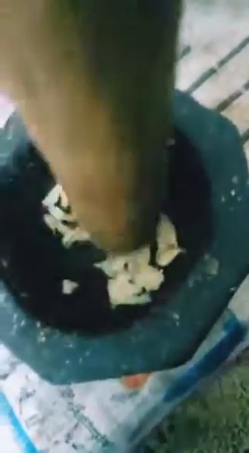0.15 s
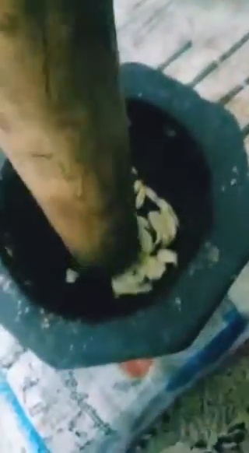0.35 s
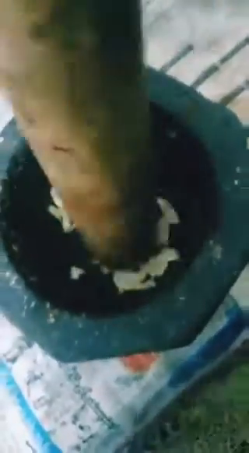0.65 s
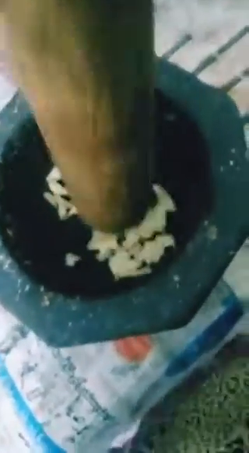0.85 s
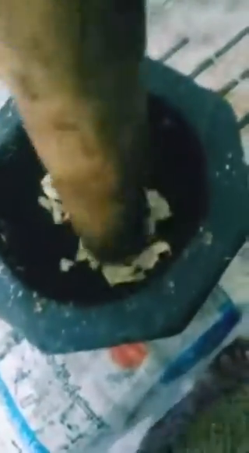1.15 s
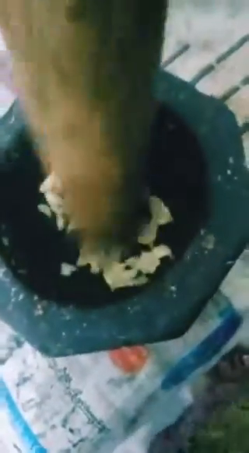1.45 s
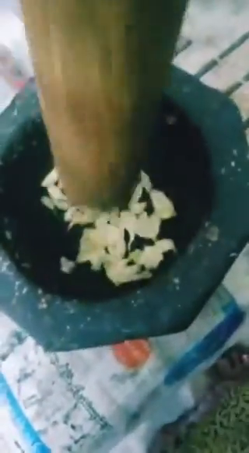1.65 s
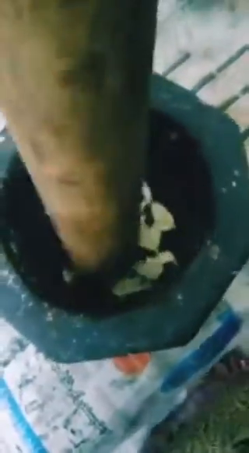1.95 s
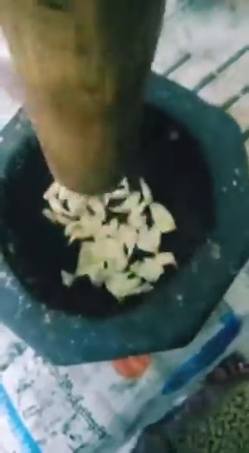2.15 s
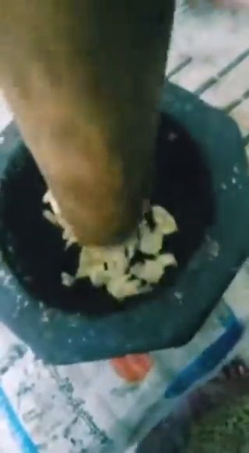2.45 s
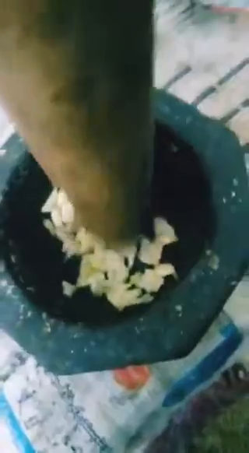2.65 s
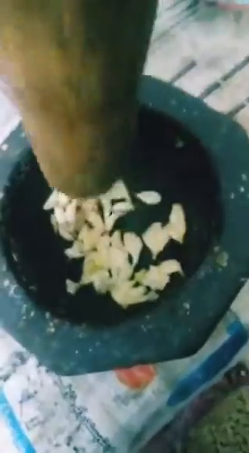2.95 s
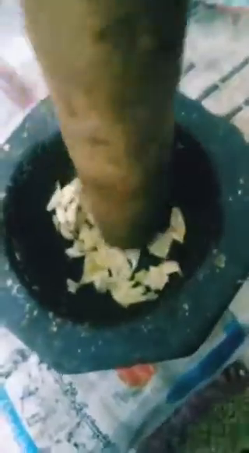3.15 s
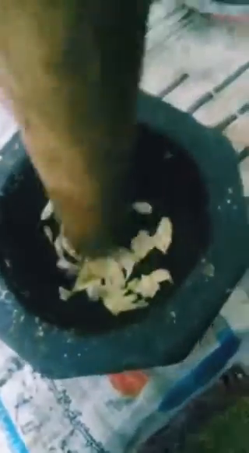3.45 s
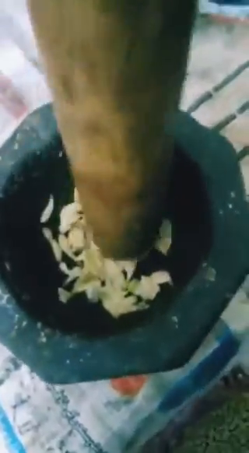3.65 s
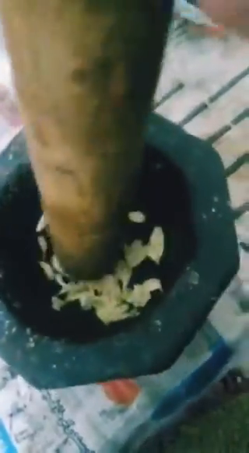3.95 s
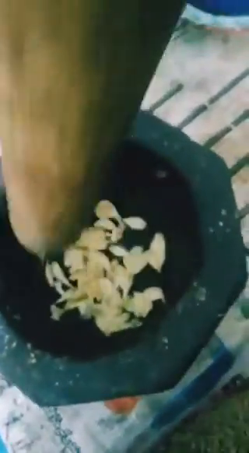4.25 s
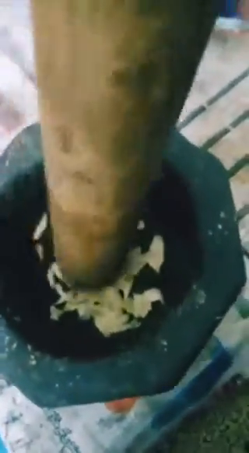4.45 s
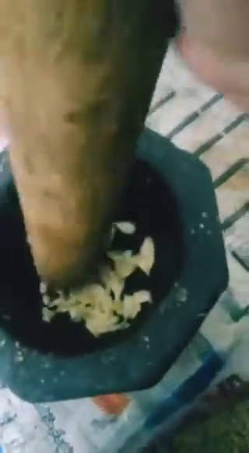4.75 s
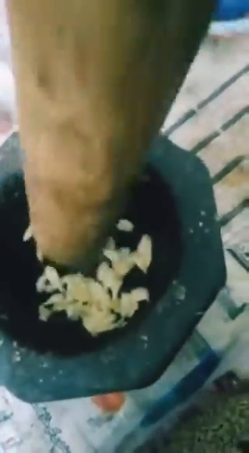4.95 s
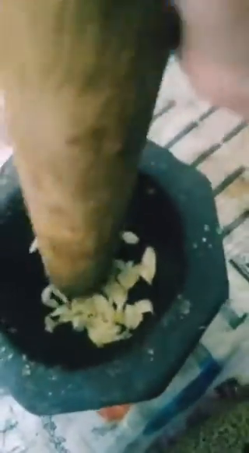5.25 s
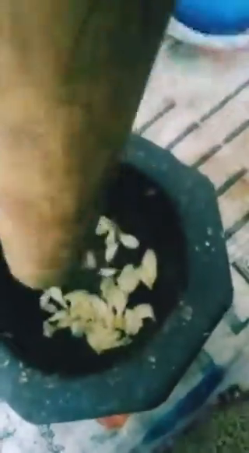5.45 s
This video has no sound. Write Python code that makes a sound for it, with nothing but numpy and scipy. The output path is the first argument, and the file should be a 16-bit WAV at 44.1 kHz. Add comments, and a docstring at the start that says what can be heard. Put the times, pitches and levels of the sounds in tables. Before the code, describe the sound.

A wooden pestle pounds garlic in a stone mortar with steady, crunchy thuds that boom in a hard-walled kitchen, over a soft hiss.

```python
"""Pounding garlic in a hard kitchen.

A stone mortar stands on the floor, heard on a stereo microphone both directly and off the walls.
Each blow of the wooden pestle crunches the cloves, thuds into the floor and sets the room booming;
now and then wood knocks on bare stone, once loudly. Behind it lie a steady hiss and a thin, fitful
whistle, which the recorder's gain control ducks at each hard blow."""
import sys
import numpy as np
from scipy import signal
from scipy.fft import rfft, irfft
from scipy.io import wavfile
from scipy.ndimage import uniform_filter1d, minimum_filter1d

SR = 44100
rng = np.random.default_rng(int(sys.argv[2]) if len(sys.argv) > 2 else 0)


def wav_out(sig):
    """Save sig, one row per channel (or a flat mono array), as 16-bit PCM at SR to the path in sys.argv[1]."""
    wavfile.write(sys.argv[1], SR, np.round(np.clip(np.atleast_2d(sig).T, -1, 1) * 32767).astype(np.int16))


N = 246519

# Levels in the tables are relative.
# pestle blows: t/s, thud/dB, crunch/dB, clack/dB
BLOWS = [(-0.048, -6.5, -12, -3), (0.3595, -15, -14, -5), (0.7723, -11, -18.5, -5),
         (1.1870, -13, -14, -3.5), (1.5830, -13, -12, -4.5), (1.9900, -9.5, -22, 1),
         (2.4003, -3, -9.5, 1.5), (2.8194, 0, -3, 2), (3.2270, -38, -13, -17.5), (3.6388, -11, -11.5, -1),
         (4.0511, -6, -9, -2.5), (4.4677, -3, -9.5, -1), (4.8853, -1.5, -7.5, 1),
         (5.2895, -11.5, -12, -4.5)]
# spectra of the bursting cloves and of the mortar's tap on the floor: f/Hz, level/dB
CRUNCH_COLOUR = [(100, -38.5), (400, 9), (900, 2.5), (2500, 1), (5000, 0.5), (8000, -4.5), (12000, -7),
                 (16000, 2)]
CLACK_COLOUR = [(60, -20.5), (170, -3.5), (300, -9), (450, 3), (560, 12.5), (760, 10), (1000, 6.5),
                (1300, -1), (2030, 4), (2250, -1.5), (2500, 2), (3200, -3), (8000, -1.5)]
# short ring of the mortar on the floor: f/Hz, level/dB, t60/s
MORTAR_MODES = [(435.3, -41.5, 0.075), (770, -50, 0.046)]
# wood meets bare stone: t/s, level/dB, overtone lift/dB
KNOCKS = [(1.9897, 10, -14), (3.6462, -16.5, 6.5), (4.0595, -14, 4), (4.475, -9, -1), (4.8935, -9.5, 0),
          (5.2990, -11.5, 0)]
# ring of the pestle on stone, two low modes first, then the overtones that a knock can brighten:
# f/Hz, level/dB, t60/s
PESTLE_MODES = [(920, 11, 0.024), (1000, -22, 0.042), (1600, 13.5, 0.01), (2010, 5, 0.026),
                (2500, -0.5, 0.028)]
# the pestle grazes the cloves as it lifts: t/s, length/s, level/dB
SCRAPES = [(0.518, 0.066, -32), (1.017, 0.1, -33.5), (1.436, 0.074, -33.5), (3.23, 0.05, -32.5),
           (4.25, 0.11, -38)]
# spectrum of a graze: f/Hz, level/dB
SCRAPE_COLOUR = [(500, -22), (2000, -6), (2700, 5), (3400, 2), (5000, -19.5), (12000, -12)]
# single reflections off floor and walls: delay/s, gain
ECHOES = [(.0068, 0.18), (.0205, .15), (.0325, 0.2), (0.0742, 0.15), (0.0956, 0.13)]
# standing waves of the kitchen: f/Hz, level/dB, t60/s
ROOM_MODES = [(102.7, -15, 1), (146.4, -6, 0.98), (185.4, 2.5, 0.58), (204, 4, 0.54), (232, -2.5, 0.63),
              (241.2, 5, 0.66), (272, -2, 0.66), (280.6, -23, 0.2), (340, -5, 1), (360.4, 5.5, 0.8),
              (409.5, 12, 0.9), (412.8, 12.5, 0.68), (449, 6, 0.46), (454, 7, 0.5), (556, 3.5, 0.52),
              (683, -2, 0.12), (766, 9, 0.33), (924, -2, 0.73), (1030, -8, 0.76)]
# spectrum of the diffuse tail: f/Hz, level/dB
TAIL_COLOUR = [(50, -45), (120, 21), (220, -3.5), (440, 9), (520, -8), (900, 0), (1300, 4.5), (2500, 1.5),
               (5000, 3), (15000, -4)]
# decay of the diffuse tail: f/Hz, t60/s
TAIL_T60 = [(100, 0.59), (300, 0.57), (800, 0.58), (2000, 0.55), (6000, 0.87), (15000, 0.59)]
# hiss spectrum at each microphone port: f/Hz, level/dB
HISS_LEFT = [(30, -38), (90, -14), (220, 3), (500, 1.5), (1000, 6.5), (2000, 7.5), (2800, 0), (4000, 9),
             (4700, 5), (6200, -7), (9000, -5.5), (11800, -11), (15000, -8)]
HISS_RIGHT = [(30, -38), (90, -11), (220, 4), (500, 2), (1000, 3.5), (2100, 1.5), (2900, 6), (4000, 11),
              (4900, 6), (6200, 3.5), (9000, 2), (11800, 1.5), (15000, 0)]
# spells of whistling, most with a surge of hiss: t/s, length/s, hiss change/dB, whistle/dB
SURGES = [(0.499, 0.12, 2, -38), (0.795, 0.12, 0, -34), (1.212, 0.098, 0.5, -38), (1.453, .38, 3.5, -37.5),
          (2.068, .38, 5, -29.5), (2.97, 0.52, 4, -39), (3.429, 0.15, 3.5, -32.5), (3.545, .23, 2, -40.5),
          (3.892, 0.072, -1.5, -31), (4.637, 0.13, 2.5, -37)]
# narrow fizz at the top of hearing: f/Hz, width/Hz, level/dB
FIZZ_BAND = (15150, 900, -34)
# likeness of the two microphone ports: f/Hz, correlation (0-1)
PORT_CORRELATION = [(100, 1), (300, 0.94), (600, 0.73), (1100, 0), (4000, 0.12), (9000, 0), (14500, 0.42)]


def pounding(thud_db=1, crunch_db=-1, clack_db=17, rebound_s=0.007, cushion=0.54, spot_count=4):
    """Crunch, thud, rebound and knocks reach the microphone directly and by way of the walls."""
    early = SR // 4  # the pounding is already under way
    direct = np.zeros((2, N + early))
    spots = np.zeros((spot_count, 2, N + early))  # each spot of the bowl wakes the room differently
    for k, (s, force_db, snap_db, stone_db) in enumerate(BLOWS):
        s += early / SR
        to_room = spots[k % spot_count]
        push = gain_of(thud_db + force_db) * thud()
        stone = gain_of(clack_db + stone_db) * clack()
        lead_s, crackle = crunch()
        snaps = gain_of(crunch_db + snap_db) * crackle
        add(direct, s - lead_s, snaps)
        add(to_room, s - lead_s, gain_of(-11) * snaps)
        add(direct, s, push)
        add(to_room, s, gain_of(-8 - cushion * force_db) * push)  # soft blows lose more punch than boom
        add(direct, s + rebound_s, gain_of(-9) * stone)
        add(to_room, s + rebound_s, stone)
    for s, db, bright_db in KNOCKS:
        s += early / SR
        ring = gain_of(db) * knock(bright_db)
        add(direct[0], s + 0.00035, ring)  # later but louder at the left port
        add(direct[1], s, gain_of(-5.5) * ring)
        add(spots[0], s, gain_of(-15) * ring)
    reverb = sum(room(spot)[:, :N + early] for spot in spots)
    return (direct + reverb)[:, early:]


def thud(hz=290, swell_s=0.0022, crest_s=0.002763):
    """The cushioned push of mortar on floor: a swing or two that swell and die at once."""
    t = np.arange(SR // 25) / SR
    push = (t / swell_s * np.exp(1 - t / swell_s)) ** 3
    return push * np.cos(2 * np.pi * hz * (t - crest_s))


def crunch(lead_s=0.016, press_db=-11, press_s=0.009):
    """Skins crackle under rising pressure, then the clove bursts; returns lead time and sound."""
    t = np.arange(SR // 25) / SR - lead_s + 0.0034  # zero at the burst, just before the thud
    burst = np.exp(-abs(t) / 0.0012)
    pressure = gain_of(press_db) * np.exp(np.minimum(t / press_s, -t / 0.002))
    noise = rng.standard_normal((2, len(t)))
    grain_db = 3.5 * rng.standard_normal(len(t))[np.arange(len(t)) // 10]
    snaps = evened(noise * gain_of(grain_db)) * (burst + pressure)
    return lead_s, coloured(snaps, CRUNCH_COLOUR) * gain_of([[-4], [2]])  # right of centre


def clack(muffle_hz=1050):
    """The mortar drops back onto the floor: one gritty tap and a hollow ring, dulled by the pulp."""
    t = np.arange(SR // 12) / SR
    grit = 0.05 * rng.standard_normal((1, len(t))) * np.exp(-t / 0.002)
    tap = coloured((t == 0) + grit, CLACK_COLOUR)[0]
    ring = sum(gain_of(db - 60 * t / t60) * np.cos(2 * np.pi * hz * t) for hz, db, t60 in MORTAR_MODES)
    return signal.lfilter(*signal.butter(1, muffle_hz, fs=SR), tap + ring)


def knock(bright_db, contact_s=0.00066):
    """Wood strikes bare stone: the pestle's modes ring, damped quickly by the hand."""
    t = np.arange(SR // 10) / SR
    ring = sum(gain_of(db + bright_db * (k > 1) - 60 * t / t60) * np.sin(2 * np.pi * hz * t)
               for k, (hz, db, t60) in enumerate(PESTLE_MODES))
    return 0.5 * ring * (1 - np.exp(-t / contact_s))


def scrapes(grain_db=3):
    """Wood drags lightly over garlic and stone, dry at the microphone."""
    level = sum(gain_of(db) * spell(s, length) for s, length, db in SCRAPES)
    friction = port_noise(N) * gain_of(grain_db * wander(400))
    return level * evened(coloured(friction, SCRAPE_COLOUR))


def room(x, diffuse_db=6.5, modes_db=-56, build_s=0.017, gap_s=0.00086):
    """Hard kitchen walls: single echoes, standing waves and a diffuse tail that dies band by band."""
    t = np.arange(SR) / SR
    hz, frame_s, bands = signal.stft(port_noise(SR), SR, nperseg=512)
    bands *= gain_of(read(TAIL_COLOUR, hz)[:, None] - 60 * frame_s / read(TAIL_T60, hz)[:, None])
    response = signal.istft(bands, SR, nperseg=512)[1][:, :SR] * gain_of(diffuse_db) * np.sqrt(20 / SR)
    for (f, db, t60), (phase, spread) in zip(ROOM_MODES, rng.random((len(ROOM_MODES), 2))):
        skew = np.array([[0], [(spread - 0.5) * f / 1200]])  # short waves reach the ports out of step
        response += gain_of(modes_db + db - 60 * t / t60) * np.sin(2 * np.pi * (f * t + phase + skew))
    response *= 1 - np.exp(-np.maximum(t - gap_s, 0) / build_s)
    for delay, gain in ECHOES:
        add(response, delay, np.full((2, 1), gain))
    return signal.fftconvolve(x, response, axes=1) * gain_of([[0.8], [-0.8]])


def hiss(level_db=-30, flutter_db=1.18, blotch_db=3.5, treble_share=0.67):
    """A fine hiss with surges, strongest near 4 kHz, made blotchy partly as by audio compression."""
    hz, frame_s, bands = signal.stft(port_noise(N), SR, nperseg=1024, noverlap=768)
    blotches = uniform_filter1d(rng.standard_normal(bands.shape[1:]), size=3, axis=0)
    blotches = evened(uniform_filter1d(blotches, size=10, axis=1))
    blotches *= blotch_db * np.clip(hz / 3000, 0.3, 1)[:, None]  # the bass is steadier
    bands *= gain_of([read(HISS_LEFT, hz), read(HISS_RIGHT, hz)])[:, :, None] * gain_of(blotches)
    surge_db = sum(rise_db * spell(s, length) for s, length, rise_db, _ in SURGES)
    treble = 1 / (1 + (7000 / (hz[:, None] + 1)) ** 4)
    follows = 1 - treble + treble_share * treble  # the treble follows a surge only in part
    bands *= gain_of(follows * np.interp(frame_s, np.arange(N) / SR, surge_db))
    sound = signal.istft(bands, SR, nperseg=1024, noverlap=768)[1][:, :N]
    return evened(sound) * gain_of(level_db + flutter_db * wander(19.2))


def whistle(hz=2590, waver_hz=9, roughness=0.83, wet_db=-4):
    """A thin, raspy tone that comes and goes, and lingers in the room."""
    tone = np.exp(2j * np.pi * np.cumsum(hz + waver_hz * wander(23.7)) / SR)
    rasp = np.array([wander(60) + 1j * wander(60) for _ in range(2)])
    level = sum(gain_of(db) * spell(s, length) for s, length, _, db in SURGES)
    direct = level * evened((tone * (1 + roughness * rasp)).real)
    reverb = gain_of(wet_db) * np.std(direct) * evened(room(direct)[:, :N])
    return gain_of(-1.5) * (direct + reverb)


def fizz():
    """A very high, shimmering band of noise, a little right of centre."""
    centre_hz, width_hz, db = FIZZ_BAND
    band = np.exp(-0.5 * ((np.fft.rfftfreq(N, 1 / SR) - centre_hz) / width_hz) ** 2)
    shimmer = gain_of(1.3 * wander(14))
    noise = irfft(rfft(port_noise(N)) * band, N)
    return gain_of(db) * evened(noise * shimmer * gain_of([[-2], [2]]))


def port_noise(count):
    """White noise at the two microphone ports, alike in the bass and mostly unrelated higher up."""
    left, unrelated = rfft(rng.standard_normal((2, count)))
    likeness = read(PORT_CORRELATION, np.fft.rfftfreq(count, 1 / SR))
    right = likeness * left + np.sqrt(1 - likeness ** 2) * unrelated
    return irfft([left, right], count)


def gain_of(db):
    """Decibels to a factor."""
    return 10 ** (np.asarray(db) / 20)


def evened(x):
    """Scales to an rms of one."""
    return x / np.sqrt(np.mean(x ** 2) + 1e-20)


def read(points, hz):
    """Reads a table on a log-frequency axis."""
    f, value = np.transpose(points)
    return np.interp(np.log(hz + 1), np.log(f + 1), value)


def add(mix, s, sound):
    """Mixes a sound in at time s, which may lie before the start."""
    at = round(s * SR)
    sound = sound[..., max(-at, 0):]
    part = mix[..., max(at, 0):][..., :sound.shape[-1]]
    part += sound[..., :part.shape[-1]]


def coloured(x, points, size=4096):
    """Minimum-phase filter that follows a table of f/Hz, level/dB."""
    log_gain = np.log(gain_of(read(points, abs(np.fft.fftfreq(size, 1 / SR)))))
    taps = np.fft.ifft(np.exp(np.conj(signal.hilbert(log_gain)))).real[:size // 2]
    return signal.fftconvolve(x, taps[None], axes=1)[:, :x.shape[1]]


def wander(rate_hz):
    """Smooth random motion with an rms of one."""
    hz = np.fft.rfftfreq(N, 1 / SR)
    return evened(irfft(rfft(rng.standard_normal(N)) * np.exp(-(hz / rate_hz) ** 2), N))


def spell(s, length_s, fade_share=0.54):
    """A level that swells to one, holds and fades."""
    level = np.zeros(N)
    add(level, s, signal.windows.tukey(round(length_s * SR), fade_share))
    return level


def scene():
    """At the microphone: the mortar in front, the steady sounds of the kitchen behind."""
    return pounding() + scrapes() + hiss() + fizz() + whistle()


def record(dry, threshold_db=-11.5, squeeze=0.46, recovery_db_per_s=100, attack_s=0.0023,
           low_cut_hz=85, high_cut_hz=15850):
    """The recorder ducks each hard blow, recovers over the boom, rounds peaks, cuts deep bass and top."""
    span = round(attack_s * SR)
    power_db = 10 * np.log10((dry ** 2).mean(0) + 1e-12)
    peak_db = -minimum_filter1d(-power_db, span)
    fall_db = np.arange(N) * recovery_db_per_s / SR
    held_db = np.maximum.accumulate(peak_db + fall_db) - fall_db
    over_db = np.maximum(held_db - threshold_db, 0)
    ducked = dry / gain_of(squeeze * uniform_filter1d(over_db, span))
    rounded = ducked / (1 + (ducked / 0.9) ** 6) ** (1 / 6)
    low_cut = signal.butter(3, low_cut_hz, "high", fs=SR, output="sos")
    high_cut = signal.firwin(601, high_cut_hz, window=("kaiser", 9), fs=SR)
    return signal.oaconvolve(signal.sosfilt(low_cut, rounded), high_cut[None], "same")


dry = scene()
out = record(dry)
wav_out(out)
```